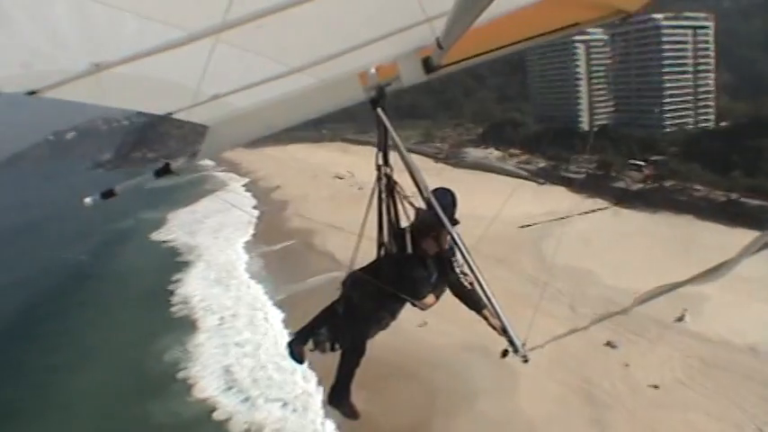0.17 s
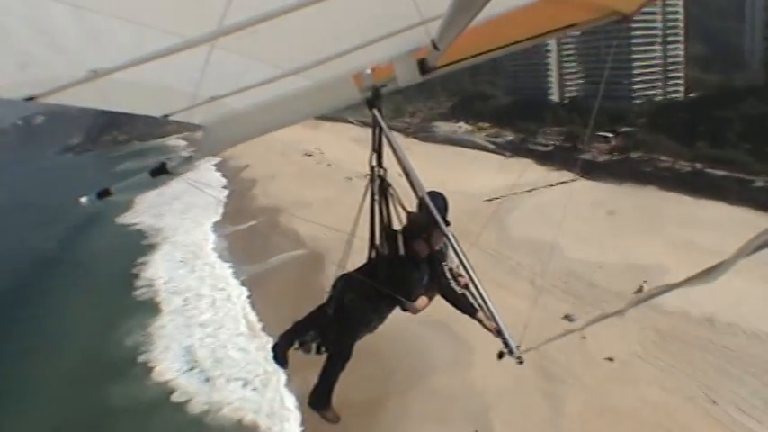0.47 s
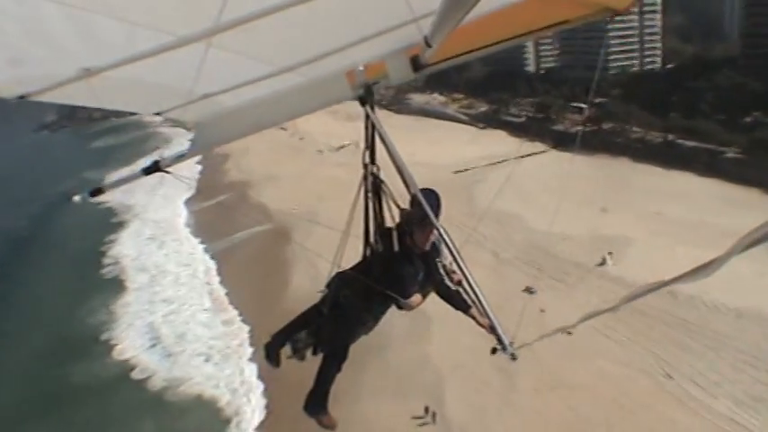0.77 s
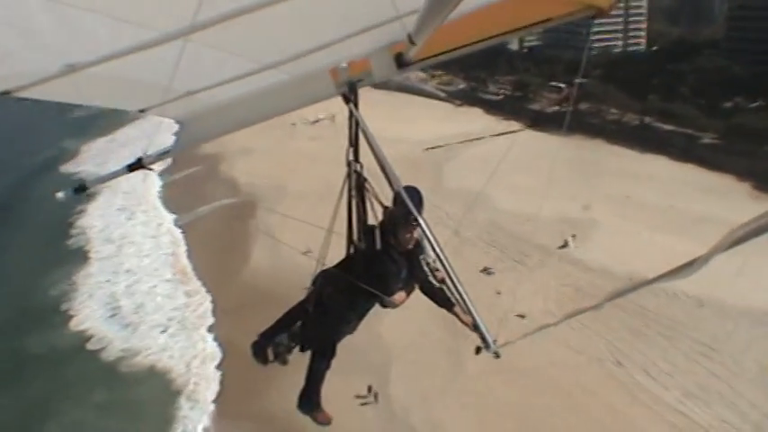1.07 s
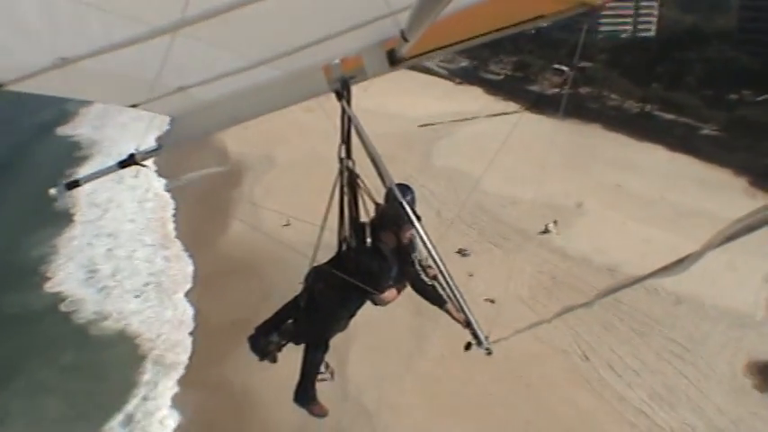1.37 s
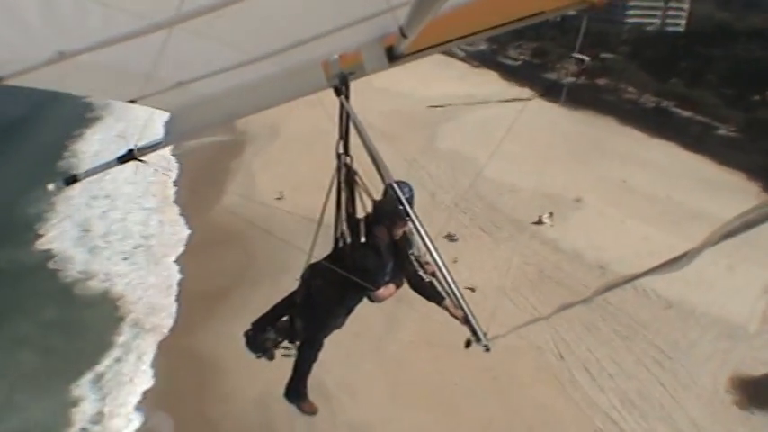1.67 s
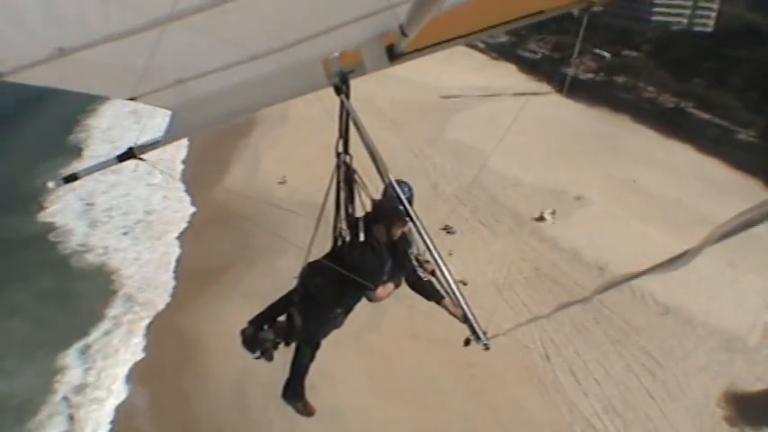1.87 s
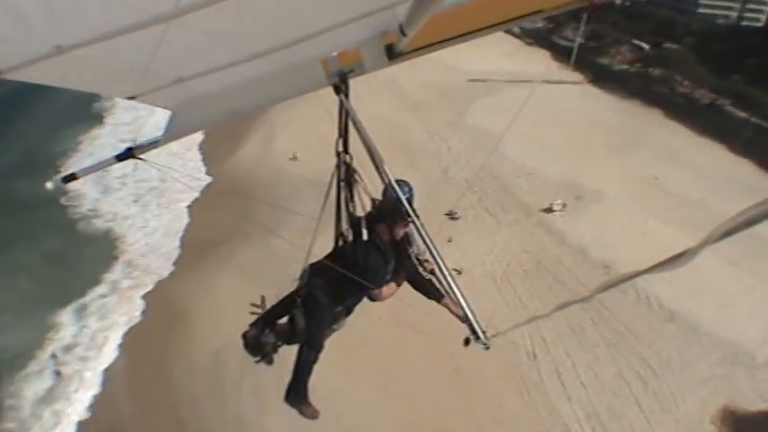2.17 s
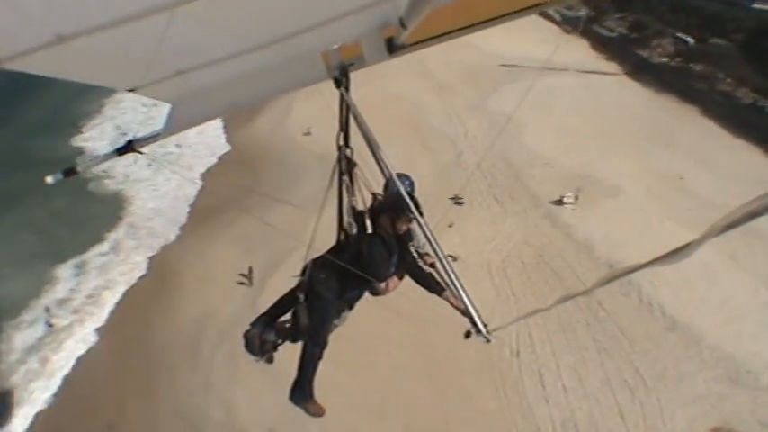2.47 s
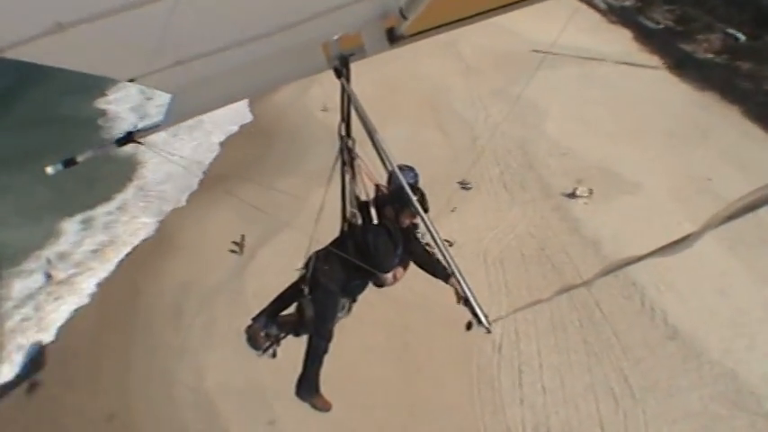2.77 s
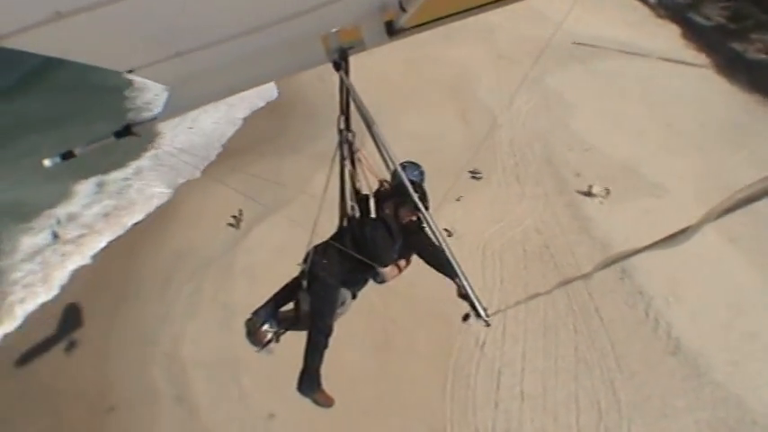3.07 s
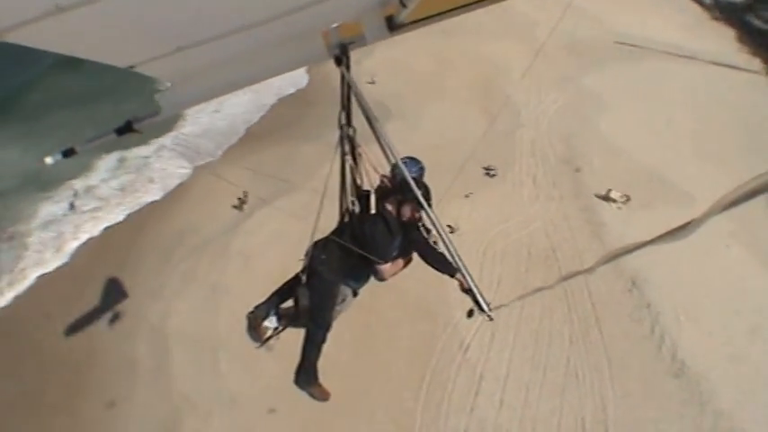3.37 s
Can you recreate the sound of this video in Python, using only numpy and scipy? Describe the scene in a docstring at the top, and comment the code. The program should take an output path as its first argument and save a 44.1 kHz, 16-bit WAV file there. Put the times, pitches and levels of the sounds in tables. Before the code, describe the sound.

Continuous wind blows directly on the microphone of a hang glider above a beach. It rumbles and flutters unevenly with a low moaning tone and brief thumps, while its sputtering hiss gradually brightens.

```python
"""Wind on a glider's camera

Air rushes over a camera's two microphone ports in flight. Eddies shed off the housing moan near
150 Hz over a lumpy rumble. Small eddies burst on the ports as a fluttering roar, buffets and spitting
hiss, with brief low throbs and a thin sheen behind. The wind brightens as airspeed builds."""
import sys
import numpy as np
from scipy import signal
from scipy.fft import rfft, irfft
from scipy.io import wavfile

SR = 44100
rng = np.random.default_rng(int(sys.argv[2]) if len(sys.argv) > 2 else 0)


def persist_wave(psi):
    """Save psi, clipped to +-1, as 16-bit WAV."""
    counts = np.round(np.clip(psi, -1, 1) * 32767).astype(np.int16)
    wavfile.write(sys.argv[1], SR, np.atleast_2d(counts).T)


N = 155232
T = np.arange(N) / SR
HZ = np.fft.rfftfreq(N, 1 / SR)
PAN = np.array([[.5], [-.5]])  # splits a left-minus-right level between the ports


def amp(db):
    return 10 ** (np.asarray(db) / 20)


def unit_rms(x):
    return x / np.sqrt(np.mean(x ** 2, axis=-1, keepdims=True) + 1e-20)


def over_frequency(points):
    hz, db = np.transpose(points)
    return np.interp(np.log(HZ + 1), np.log(hz + 1), db)


def over_time(table, column):
    rows = np.array(table)
    return np.interp(T, rows[:, 0], rows[:, column])


def highpass(hz, order):
    return HZ ** order / (HZ ** order + hz ** order)


def turbulence(top_hz, shared=0.83):
    """Pinkish random drift up to top_hz, partly shared by both ports."""
    spectrum = rfft(rng.standard_normal((3, N))) / np.sqrt(HZ + 96) / (1 + (HZ / top_hz) ** 2)
    both, own = np.split(unit_rms(irfft(spectrum * highpass(3, 1), N)), [1])
    return np.sqrt(shared) * both + np.sqrt(1 - shared) * own


# The wind's fader moves. Each row: time in seconds, then rumble, body, roar, rasp and hiss in dB.
GUSTS = [(0.05, -26, -19.5, -22, -28, -35), (0.11, -21.5, -19.5, -20, -34.5, -35),
         (0.25, -30, -18, -29, -26, -39.5), (0.29, -26, -21, -23, -41, -39),
         (0.47, -24.5, -18, -19, -47, -35.5), (0.53, -24, -18, -22.5, -40, -37),
         (0.6, -23, -21, -21, -33, -36.5), (0.92, -27, -15, -24, -31.5, -36.5),
         (0.96, -25, -20.5, -14.5, -40, -32), (0.99, -33, -14.5, -21.5, -48, -38.5),
         (1.04, -30, -18, -22.5, -48, -36), (1.14, -18, -16.5, -16, -40, -33.5),
         (1.17, -39, -11.5, -21.5, -28, -35), (1.31, -26, -17, -18, -34, -32.5),
         (1.4, -25, -16, -16, -48, -33), (1.51, -29, -13, -20, -43, -34), (1.8, -19.5, -17, -17, -26, -33),
         (2.05, -26.5, -14, -20, -28, -34), (2.38, -32, -14.5, -20, -25, -32.5),
         (2.47, -26, -16, -18, -25.5, -32.5), (2.53, -25, -14.5, -20.5, -23.5, -32.5),
         (2.56, -27, -19, -18.5, -23.5, -33.5), (2.69, -25, -12.5, -18, -26, -32),
         (2.8, -32, -20.5, -19, -27, -32.5), (2.86, -33, -13.5, -18, -25.5, -32.5),
         (3.05, -27, -17, -20.5, -25, -34), (3.25, -29, -17.5, -19, -25, -32.5),
         (3.33, -25, -17.5, -17.5, -25.5, -34), (3.5, -41, -13.5, -26, -21, -36.5)]
# Those five layers, low to high. Each row: low and high edge in Hz, flutter depth in dB,
# fast flicker depth in dB, lock to the moan from 0 to 1.
WIND_LAYERS = [(10, 194, -3, 2, 0), (178, 318, 0.32, -0.33, 0.52), (402, 1140, 2, 2, 0.47),
               (1110, 1600, 0.5, 1, 0.56), (2000, 23000, 0, 1.5, 0.61)]
# The wind's tone colour. Each row: frequency in Hz, relative spectral level in dB.
WIND_COLOUR = [(12, -52.5), (20, -20), (35, -2), (93, 2), (141, -1.5), (213, -4), (259, -4.5), (769, -12.5),
               (1500, -20), (2480, -28.5), (3400, -31.5), (4700, -36), (9170, -53), (15600, -74.5)]
# Stereo width. Each row: frequency in Hz, side minus mid in dB.
WIND_WIDTH = [(60, -45), (110, -38), (200, -22), (380, -11), (700, -3.5), (1290, -1.5), (2380, 0.5),
              (4400, -0.5), (8120, -5.5), (15000, 0.5)]
# The treble leans left. Each row: frequency in Hz, left minus right in dB.
TREBLE_LEAN = [(60, 0), (1200, 0), (2400, 1.8), (9000, 1.8), (15000, .3)]


def wind(moan_wave, lock_db=3):
    """Air rushing over the ports: fluttering noise bands, the upper four swelling on the moan's crests."""
    flutter, flicker = turbulence(top_hz=30.2), turbulence(top_hz=363)
    colour, lean = amp(over_frequency(WIND_COLOUR)), amp(PAN * over_frequency(TREBLE_LEAN))
    side_power = amp(over_frequency(WIND_WIDTH)) ** 2
    coherence = (1 - side_power) / (1 + side_power)
    out = np.zeros((2, N))
    for column, (low_hz, high_hz, flutter_db, flicker_db, lock) in enumerate(WIND_LAYERS, 1):
        tremble = amp(flutter_db * flutter + flicker_db * flicker + lock * lock_db * moan_wave)
        envelope = unit_rms(tremble) * amp(over_time(GUSTS, column))
        band = colour * np.sqrt(abs(highpass(low_hz, 4) - highpass(high_hz, 4)))
        left, unrelated = rfft(rng.standard_normal((2, N)) * envelope)
        right = coherence * left + np.sqrt(1 - coherence ** 2) * unrelated
        out += irfft(lean * [left, right] * unit_rms(band), N)
    return out


# The moan's melody. Each row: time in seconds, shedding pitch in Hz, level in dB.
MOAN_LINE = [(0.05, 96.8, -26), (0.11, 89.3, -24.5), (0.17, 90.4, -27.5), (0.23, 122.3, -15.5),
             (0.29, 124.3, -19), (0.35, 120.6, -16.5), (0.41, 120.8, -32.5), (0.49, 140.4, -18),
             (0.53, 134.4, -42), (0.64, 124.8, -28), (0.76, 135.2, -23), (0.89, 132, -36),
             (0.94, 139.8, -15), (1.01, 134.9, -28), (1.07, 134.5, -14.5), (1.13, 120.7, -27),
             (1.2, 146.1, -20.5), (1.28, 147.2, -24.5), (1.36, 144, -16), (1.46, 151.5, -28),
             (1.64, 149.9, -31), (1.7, 163.2, -16.5), (1.77, 167.5, -22), (1.81, 159.5, -27),
             (1.89, 150, -12.5), (1.96, 153.3, -24), (2.03, 159.6, -17), (2.12, 153.9, -24),
             (2.19, 158.5, -24), (2.27, 154, -17), (2.42, 149.8, -17), (2.5, 160.9, -23),
             (2.57, 158, -17.5), (2.7, 131.8, -26), (2.81, 135.6, -29), (2.86, 149.8, -20),
             (2.94, 143, -14.5), (3.03, 153.5, -23.5), (3.15, 150, -22.5), (3.27, 146, -23.5),
             (3.5, 144.6, -42)]


def moan(width_hz=21.5, steady=0.82, waver=0.027):
    """Eddies shedding off the housing: a wavering tone plus noise resonating on the same pitch."""
    hz = over_time(MOAN_LINE, 1) * (1 + waver * turbulence(top_hz=15.7)[0])
    carrier = np.exp(2j * np.pi * np.cumsum(hz) / SR)
    pole = np.exp(-np.pi * width_hz / SR)
    drift = rng.standard_normal(N) / carrier
    for _ in range(2):
        drift = signal.lfilter([1 - pole], [1, -pole], drift)
    breath = unit_rms((carrier * drift).real)
    return unit_rms(steady * unit_rms(carrier.real) + (1 - steady) * breath)


def build_airspeed(air, db_per_s=8.5, shelf_hz=7600):
    """Rising airspeed brightens the wind: a treble shelf climbs from cut to boost."""
    treble = irfft(rfft(air) * highpass(shelf_hz, 2), N)
    return air + treble * (amp(db_per_s * (T - T.mean())) - 1)


def pressure_swing(hz, half_width_cycles):
    """One push and pull of pressure on a port, the push the stronger."""
    cycles = np.arange(-300, 301) / SR * hz
    swing = np.exp(-(cycles / half_width_cycles) ** 2) * np.sin(1 - 2 * np.pi * cycles)
    return swing - swing.sum() / 300.5 * np.hanning(601)  # cancels the net pressure


# The pitches of the patter in Hz.
PATTER_HZ = (336, 510, 735, 980, 1370)
# The featured knocks. Each row: start in seconds, level in dB, pitch in Hz, left minus right in dB.
BUFFETS = [(0.225, -6.5, 447, -2), (0.311, -11, 580, 4), (0.35, -19, 475, 10), (0.459, -8, 330, 0),
           (0.603, -17, 594, -9), (0.648, -5, 359, -2), (0.702, -6, 410, 1), (0.756, 0, 644, 0.0),
           (0.873, -4, 397, -2), (0.911, -7, 498, 3), (0.945, -10, 487, -2.0), (0.97, -8, 696, -2),
           (1.053, -9, 385, -4), (1.086, -13, 373.5, 3), (1.234, -6, 357, -1), (1.257, -3, 458, -2),
           (1.311, -6, 617, 1.5), (1.386, -7, 620, 5), (1.629, 1, 375, 0.5), (1.765, 2, 384.4, 2),
           (1.803, -12, 442.5, 7), (1.871, 0.5, 380, 1), (1.974, -7, 353.3, 1.5), (2.04, -28, 422, 9),
           (2.066, -1, 414.5, 2), (2.414, -10, 412.6, -0.5), (2.681, -3, 379.6, 1)]


def buffets(patter_per_s=260, spread_db=5.5, db_per_octave=-2, half_width_cycles=0.39):
    """Single pressure swings hit the ports: a random patter of small ones, and strong ones on cue."""
    patter = np.zeros((2, N))
    for hz in PATTER_HZ:
        hits = rng.random(N) < patter_per_s / len(PATTER_HZ) / SR
        polarity = np.where(rng.random(N) < .7, 1, -1)
        size = amp(spread_db * np.minimum(rng.exponential(1, N), 2)) * rng.uniform(0.21, 1, (2, N))
        swing = amp(db_per_octave * np.log2(hz / PATTER_HZ[0])) * pressure_swing(hz, half_width_cycles)
        patter += signal.oaconvolve(hits * polarity * size, swing[None], "same")
    out = unit_rms(patter) * amp(over_time(GUSTS, 3) - 6.5)  # rides under the roar
    for start, db, hz, pan_db in BUFFETS:
        centre = round((start + half_width_cycles / hz) * SR)
        out[:, centre - 300:centre + 301] += pressure_swing(hz, half_width_cycles) * amp(db + PAN * pan_db)
    return out


# The featured spits. Each row: start in seconds, rough peak level in dB, left minus right in dB,
# boost or cut of the top end in dB.
EDDY_BURSTS = [(0.1194, -25, 4, -3), (0.225, -28, 1, -8), (0.3123, -29, 8, -8), (0.353, -31, 5, -9),
               (0.3621, -34, 2, -6), (0.4664, -33, -4, -6), (0.553, -32, 9, -3), (0.7825, -29, -3, -3),
               (0.8417, -23, -4, -14), (0.875, -26, -8, -10), (0.913, -31, -1, -6), (0.9626, -27, -11, -11),
               (0.9912, -28, 1.0, -5), (1.0281, -25, -1, -6), (1.0674, -26.5, 3, -10), (1.09, -34, 4, -3),
               (1.1609, -27, 1.5, -3), (1.137, -31, -2, 0), (1.184, -28, 0, 0), (1.204, -20, -5, -10),
               (1.259, -27, 2.0, -3), (1.3402, -34, 0, -3), (1.3965, -29, 0, -6), (1.4775, -23, 1.0, -7),
               (1.531, -25, 0, -1), (1.5379, -27, 2, -1), (1.564, -27, 9, -5), (1.5959, -24.5, -2.0, -5),
               (1.643, -31, -5, -3), (1.6583, -25, 6, 1), (1.6706, -22, -6, -3), (1.731, -24.5, -2, 4),
               (1.753, -34, 2, -3), (1.774, -27, 3, -3), (1.803, -23.5, -4, -7), (1.848, -30, 12, -5),
               (1.871, -27, -2.5, -5), (1.878, -32, 1, -2), (1.894, -23, -10, -6), (1.902, -24, 2, -4),
               (1.9113, -25, -8, -7), (1.971, -24, -2.0, -8), (1.977, -21.5, 0, -8), (1.995, -27, 0, -7),
               (2.1401, -21.5, -1, -7), (2.1665, -17, -8, -9), (2.246, -29, 2, 1.0), (2.265, -33, 0, 3),
               (2.291, -19, 3, -10), (2.331, -32, 2.5, 0), (2.3644, -35, -1, 3), (2.419, -29, 0, -1),
               (2.431, -23.5, -3, 3), (2.4613, -27, 0.5, -7), (2.617, -29, 1.0, -1), (2.6817, -30, 2.5, -3),
               (2.7086, -24, 8, -3), (2.7842, -30, -5, -3), (2.8126, -32, 9, -3), (2.862, -23, -7, -5),
               (2.9453, -21, 0, -5), (2.9762, -22, 8, -5), (2.998, -22, -9, -3), (3.0992, -27, 14, -3),
               (3.1595, -19, -2, -3), (3.1673, -25, 3, -3), (3.2051, -30, 6, -1), (3.2911, -29, 2.5, 2),
               (3.3687, -26, 4, 5), (3.4303, -30, 3, -3)]


def eddy_bursts(spits_per_s=110, rise_s=0.00053, fall_s=0.0012, crest_db=11, top_hz=9300):
    """Small eddies burst on the ports as puffs of hiss: a random sputter, and strong ones on cue."""
    size_db = over_time(GUSTS, 5) - 7 + 2 * np.minimum(rng.exponential(1, N), 2)  # rides under the hiss
    spits = (rng.random(N) < spits_per_s / SR) * amp(size_db) * rng.uniform(0.43, 1, (2, N))
    hits = np.array([spits, spits * amp(-2)]) ** 2  # power below and above top_hz
    for start, db, pan_db, top_db in EDDY_BURSTS:
        puff = amp(db - crest_db + PAN[:, 0] * pan_db)
        hits[:, :, round(start * SR)] += np.array([puff, puff * amp(top_db)]) ** 2
    age = np.arange(1000) / SR
    envelope = (1 - np.exp(-age / rise_s)) * np.exp(-age / fall_s)
    power = abs(signal.oaconvolve(hits, (envelope / envelope.max())[None, None] ** 2))[:, :, :N]
    band = amp(0.73 * over_frequency(WIND_COLOUR)) * highpass(1540, 2)  # a brighter, thinner wind
    band /= np.sqrt(np.mean(band ** 2 * (HZ > 5000)))
    noise = unit_rms(rng.standard_normal((2, N)) + 0.42 * rng.standard_normal(N))  # partly shared
    low, high = rfft(noise * np.sqrt(power))
    crossover, lean = highpass(top_hz, 6), amp(PAN * over_frequency(TREBLE_LEAN))
    return irfft((low * (1 - crossover) + high * crossover) * band * lean, N)


# The sheen's tone colour. Each row: frequency in Hz, relative spectral level in dB.
SHEEN_COLOUR = [(2000, -30), (5000, -13), (8000, -2), (10500, -7), (12500, -16), (15700, -26)]


def sheen(level_db=-57):
    """A steady, distant high hiss, nearly alike on both ports."""
    noise = rng.standard_normal(N) + 0.19 * rng.standard_normal((2, N))
    band = amp(over_frequency(SHEEN_COLOUR)) * (HZ > 2000)
    return amp(level_db) * unit_rms(irfft(rfft(noise) * band, N))


# Short hums in the roar. Each row: centre in seconds, half-width in seconds, peak in dB, pitch in Hz.
THROBS = [(0.27, 0.02, -14, 245), (0.666, 0.024, -17, 324.6), (1.057, 0.021, -16, 280),
          (1.17, 0.023, -16, 290), (1.843, 0.034, -13, 269.5), (2.863, 0.033, -14, 235.2),
          (3.12, 0.015, -9, 231.6), (3.249, .012, -18.5, 800), (3.3, 0.013, -14, 220.3)]


def throbs():
    """Brief pressure wobbles that swell and fade, alike on both ports."""
    out = np.zeros(N)
    for centre, half_width, db, hz in THROBS:
        envelope = amp(db) * np.exp(-((T - centre) / half_width) ** 2)
        out += envelope * np.sin(2 * np.pi * (hz * T + rng.random()))
    return out


# Quick ducks in level. Each row: centre in seconds, half-width in seconds, deepest gain in dB.
LEVEL_DIPS = [(0.773, 0.0026, -12), (0.893, 0.0072, -7.5), (1.78, 0.0088, -6.5)]


def level_dips():
    """The sound ducks on cue for a few milliseconds, as under a limiter."""
    return amp(sum(db * np.exp(-((T - centre) / half_width) ** 2) for centre, half_width, db in LEVEL_DIPS))


def scene():
    """Everything but the sheen follows the level dips."""
    moan_wave = moan()
    air = wind(moan_wave) + moan_wave * amp(over_time(MOAN_LINE, 2))
    return (build_airspeed(air) + throbs() + buffets() + eddy_bursts()) * level_dips() + sheen()


def record(dry, ceiling=0.85, start_s=0.037, cutoff_hz=15650):
    """The microphone overloads softly and loses the highest treble; sound opens after a short silence."""
    fade_in = np.clip((T - start_s) / 0.0031, 0, 1)
    saturated = ceiling * np.tanh(dry / ceiling) * fade_in
    lowpass = signal.firwin(511, cutoff_hz, window=("kaiser", 9), fs=SR)
    return signal.oaconvolve(saturated, lowpass[None], "same")


dry = scene()
out = record(dry)
persist_wave(out)
```